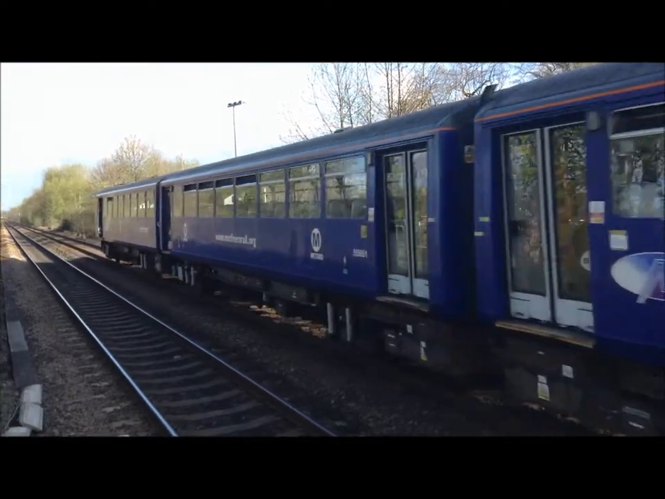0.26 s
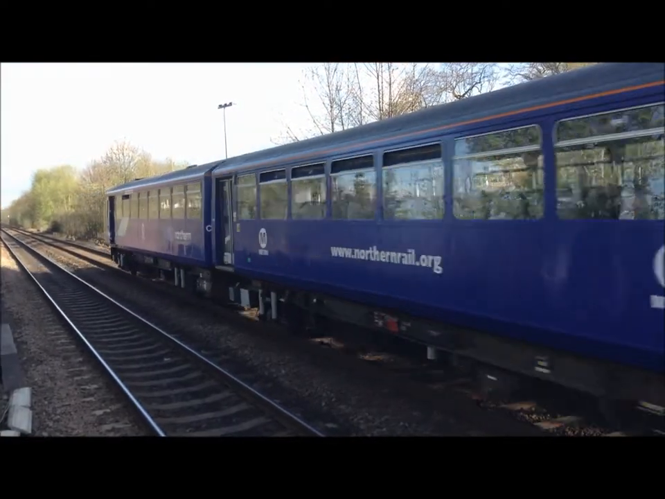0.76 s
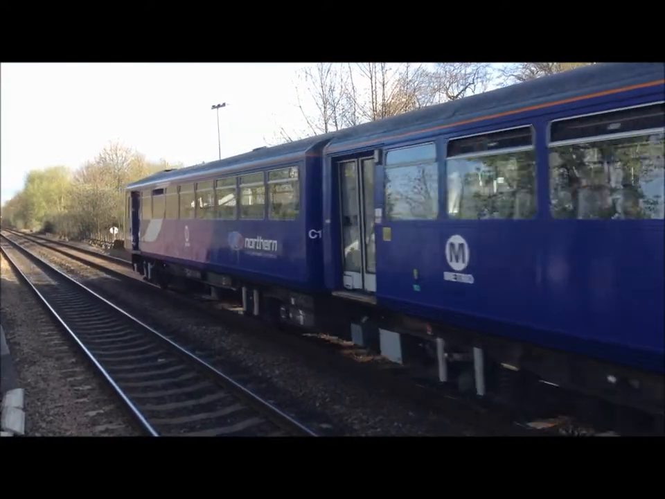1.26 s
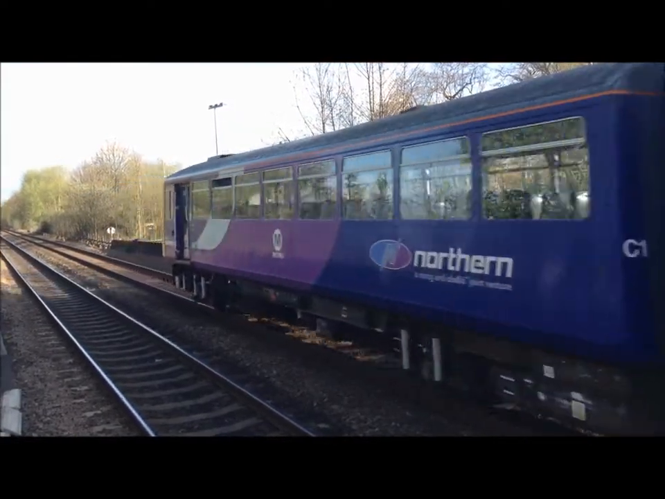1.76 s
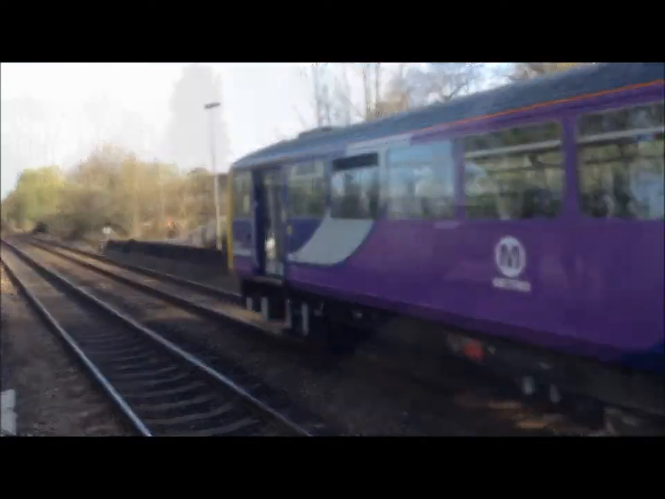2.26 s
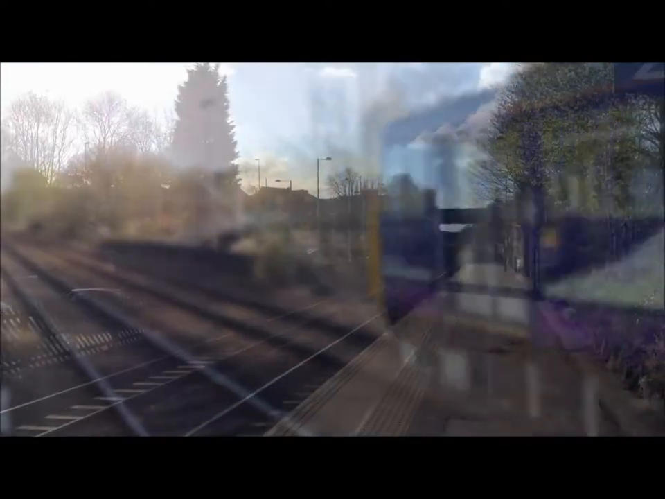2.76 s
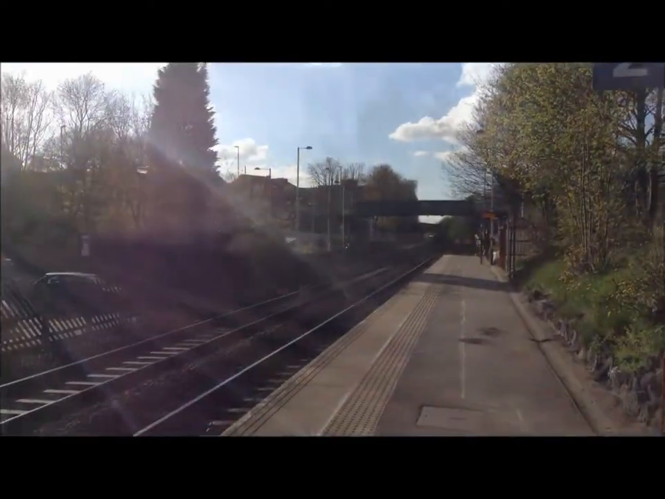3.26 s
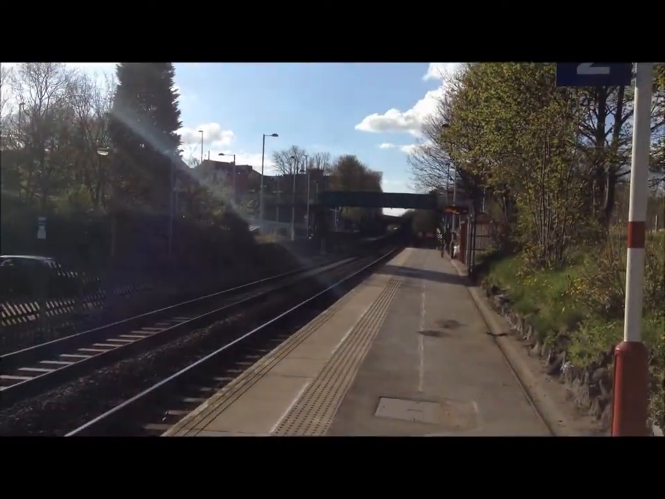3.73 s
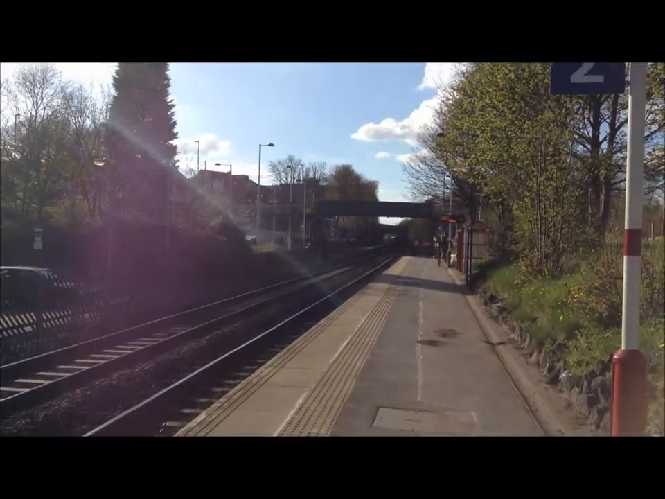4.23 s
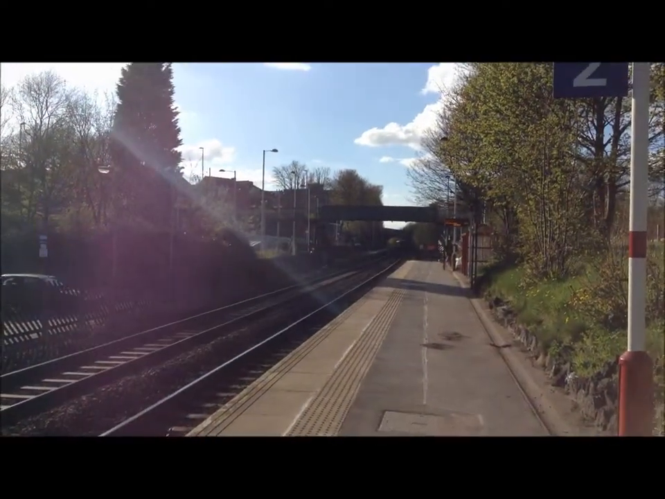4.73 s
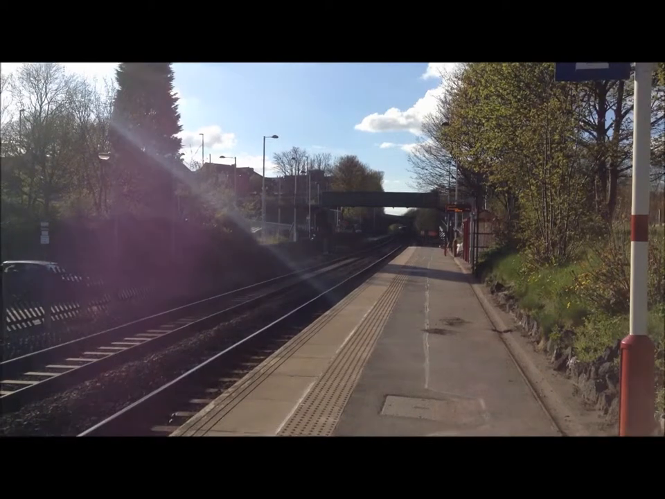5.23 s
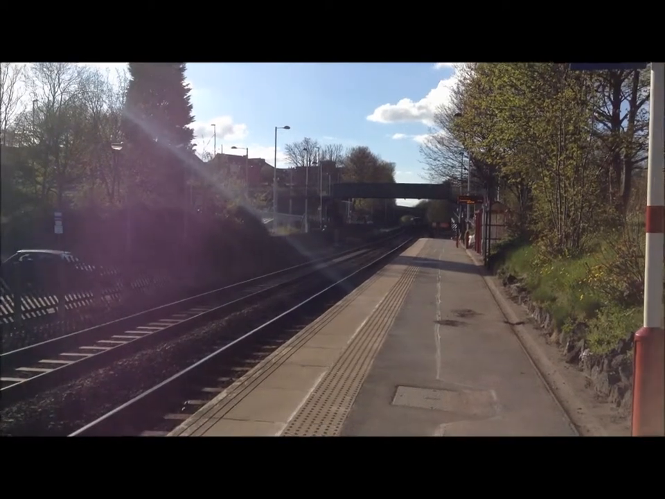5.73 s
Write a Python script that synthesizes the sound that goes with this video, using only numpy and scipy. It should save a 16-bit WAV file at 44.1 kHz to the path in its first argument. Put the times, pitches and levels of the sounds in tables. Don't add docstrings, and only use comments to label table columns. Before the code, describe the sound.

Outdoors beside the track, a loud, steady train rush fills the first three and a half seconds, with knocks, rapid hissing puffs, singing wheels, then piercing broken squeals as it dulls slightly. An instant cut leaves a soft far-road drone and hiss, a faint idling engine, tiny high chirps and a gently rising engine note. Near-mono, compact camera sound.

```python
import sys
import numpy as np
from scipy import signal
from scipy.fft import rfft, irfft, next_fast_len
from scipy.io import wavfile
from scipy.ndimage import uniform_filter1d, map_coordinates

SR = 44100
rng = np.random.default_rng(int(sys.argv[2]) if len(sys.argv) > 2 else 0)


def level_to_linear(level):
    exponent = np.asarray(level, float) / 20
    return 10 ** exponent


def wav_out(sig):
    wavfile.write(sys.argv[1], SR, np.round(np.clip(np.atleast_2d(sig).T, -1, 1) * 32767).astype(np.int16))


N = 264159
T = np.arange(N) / SR


def unit(x):
    return x / np.sqrt(np.mean(x ** 2) + 1e-20)


def curves(rows):
    s, *cols = np.transpose(rows)
    return [np.interp(T, s, c) for c in cols]


def wobble(rate):
    coarse = T[::64]
    knots = rng.standard_normal(int(N * rate / SR) + 4)
    return np.interp(T, coarse, map_coordinates(knots, [coarse * rate]))


def filtered(x, response):
    m = next_fast_len(len(x) + 8192)
    return irfft(rfft(x, m) * response(np.fft.rfftfreq(m, 1 / SR)), m)[:len(x)]


def rush(spectrum, patchy_db):
    z = signal.stft(rng.standard_normal(N), nperseg=512)[2]
    patches = uniform_filter1d(rng.standard_normal(z.shape), size=5, axis=0)
    patches = uniform_filter1d(patches, size=10, axis=1)
    white = signal.istft(z * level_to_linear(patchy_db * unit(patches)), nperseg=512)[1][:N]
    f, db = np.transpose(spectrum)
    return unit(filtered(white, lambda hz: level_to_linear(np.interp(np.log(hz + 1), np.log(f), db))))


def ring(white, hz, width):
    return unit(filtered(white, lambda f: (f * width / (hz * hz - f * f + 1j * f * width)) ** 2))


def rung(modes, swell_db, rate):
    white = rng.standard_normal(N)
    return sum(level_to_linear(db + swell_db * wobble(rate)) * ring(white, hz, width) for hz, width, db in modes)


def swells(events):
    white, out = rng.standard_normal(N), np.zeros(N)
    for s, d, hz, width, db in events:
        near = abs(T - s) < d / 2
        broken = level_to_linear(2.2 * wobble(16)[near])
        arch = np.cos(np.pi * (T[near] - s) / d)
        out[near] += level_to_linear(db) * broken * arch * ring(white[near], hz, width)
    return out


def tone(hz, db, flutter_db, rate):
    cycles = np.cumsum(hz + 0 * T) / SR + rng.random()
    return level_to_linear(db + 5.0 + flutter_db * wobble(rate)) * np.sin(2 * np.pi * cycles)


def traffic():
    # (time [s], low traffic level [dB], tyre hiss level [dB])
    road = [
        (3.63, -48, -43.5),
        (4.27, -47, -44.5),
        (4.66, -46, -42.5),
        (5.99, -47, -43.5),
    ]
    # (frequency [Hz], density [dB per Hz])
    drone_colour = [(15, -78), (25, -48), (64, -31), (86, -11.5), (151, -16), (185, -2), (220, -4.5),
                    (244, -4.5), (312, -5), (405, -14.5), (616, -4.5), (800, -14), (1040, -42.5),
                    (1760, -120)]
    # (frequency [Hz], density [dB per Hz])
    tyre_colour = [(350, -29.5), (600, -11), (658, -14.5), (834, -9), (953, -2.5), (1100, -6.5),
                   (1350, -8.5), (1580, -12), (2000, -11), (3170, -22), (3820, -25.5), (5090, -40),
                   (7000, -52), (9100, -75), (15400, -120)]
    bass_gone_s, bass_fade_s, bass_hz, bass_share = 4.6, .3, 125.2, .6
    drone_db, tyre_db = curves(road)
    drone = level_to_linear(drone_db + .6 * wobble(9)) * rush(drone_colour, patchy_db=1.1)
    gone = bass_share * np.clip((T - bass_gone_s) / bass_fade_s, 0, 1)
    drone = drone - gone * filtered(drone, lambda hz: 1 / (1 + (hz / bass_hz) ** 8))
    return drone + level_to_linear(tyre_db + .4 * wobble(9)) * rush(tyre_colour, patchy_db=.8)


def humming_tyres():
    # (middle [s], length [s], frequency [Hz], width [Hz], level [dB])
    hums = [(3.68, .4, 1100, 70, -49), (3.95, 0.45, 970, 90, -49), (3.9, .2, 1090, 70, -53),
            (4.47, .5, 990, 100, -50), (4.83, .35, 930, 60, -50), (5.08, .35, 960, 80, -51),
            (5.32, .2, 950, 80, -55), (5.76, .45, 980, 100, -55), (4.985, 0.083, 590, 25, -55),
            (5.18, .25, 477, 20, -58), (5.5, .14, 1300, 110, -51), (5.35, .2, 1400, 80, -54),
            (4.928, 1.6, 5000, 2900, -77), (5, .2, 199, 14, -53), (5.36, .2, 210, 14, -55),
            (5.56, 0.11, 150, 14, -53)]
    return swells(hums)


def idling_engine():
    # (frequency [Hz], level [dB])
    orders = [
        (96.9, -70),
        (193.8, -63),
    ]
    fade_db = 25 * np.clip(T - 4.6, 0, 1)
    return sum(tone(hz, db - fade_db, flutter_db=1.5, rate=8) for hz, db in orders)


def vehicle():
    # (time [s], firing rate [Hz], level [dB], upper orders [dB])
    run = [
        (4.6, 63.2, -62.5, -1),
        (5.23, 68.84, -64.5, -10),
        (5.45, 72.3, -56, -13),
        (5.56, 73.5, -56, -6),
        (5.68, 74.9, -56, -4),
        (5.73, 75.7, -54.5, 4.5),
        (5.87, 75.9, -54, -0.5),
        (5.99, 79.2, -53, 1),
    ]
    # (multiple of the firing rate [1], level [dB], share of the opening [1])
    pipe = [(1, -14, 0), (2, -3, 0), (3, -5, -.4), (4, -4, .3), (5, 0, .2), (6, 4, 1), (7, -4, 1),
            (8, -14, 1)]
    hz, db, upper_db = curves(run)
    hz = hz + .4 * wobble(12)
    db = db - 30 * np.clip(run[0][0] - T, 0, 1)
    return sum(tone(k * hz, db + level + opens * upper_db, flutter_db=1.4, rate=14) for k, level, opens in pipe)


def bird():
    # (start [s], length [s], pitch [Hz], level [dB])
    calls = [
        (4.91, .03, 7100, -80),
        (5.005, .08, 7050, -76),
        (5.215, .05, 7000, -77.5),
        (5.27, .05, 7050, -78.5),
    ]
    hoarse_hz = 60 * wobble(90)
    out = np.zeros(N)
    for s, d, hz, db in calls:
        arch = np.sin(np.pi * np.clip((T - s) / d, 0, 1))
        out += arch * tone(hz + hoarse_hz, db - 4, flutter_db=3, rate=80)
    return out


def exhaust():
    # (frequency [Hz], level [dB])
    orders = [
        (79, -63.5),
        (122, -55),
    ]
    return sum(tone(hz, db, flutter_db=2.5, rate=5) for hz, db in orders)


def engine_leak():
    # (time [s], peak level [dB])
    puffs = [(.4846, -21), (.772, -21), (.847, -16), (.885, -19), (.919, -13.5), (.958, -19),
             (.9975, -16.5), (1.034, -18.5), (1.074, -15.5), (1.112, -17), (1.149, -12.5), (1.189, -15.5),
             (1.226, -13), (1.3, -16.5), (1.34, -21), (1.4155, -20), (1.46, -16), (1.533, -18),
             (1.612, -17), (1.77, -17), (1.794, -20)]
    rise_s = 0.0049
    pressure = np.zeros(N)
    for s, db in puffs:
        u = np.clip(T - s, 0, 1) / rise_s
        pressure += level_to_linear(db) * u * np.exp(1 - u)
    return level_to_linear(-5) * pressure * rush([(3000, -120), (5000, -4), (9000, -5.5), (15300, -10.0)], patchy_db=1.5)


def air_hiss():
    # (frequency [Hz], density [dB per Hz])
    colour = [(2940, -33), (5000, -7), (7460, -3.5), (9390, -4), (10100, -6), (14300, -11.5), (15000, -15)]
    return rush(colour, patchy_db=0.5)


def track_rumble():
    # (frequency [Hz], density [dB per Hz])
    colour = [(15, -78), (25, -58), (48, -45), (188, -5), (289, -2.5), (382, -3.5), (515, 0.5), (569, -3.5),
              (729, -3), (1300, -14.5), (1690, -22.5), (2860, -120)]
    # (frequency [Hz], width [Hz], level under the rumble [dB])
    rail_modes = [(200, 32, -25.5), (291.2, 33, -9), (329.6, 19.5, -11.5), (440.8, 13, -15),
                  (517.7, 45, -9), (727.4, 78.7, -14)]
    return unit(rush(colour, patchy_db=1.2) + rung(rail_modes, swell_db=1.5, rate=12))


def wheel_roar():
    # (frequency [Hz], density [dB per Hz])
    colour = [(530, -25.5), (900, -2.5), (1040, -5.5), (1200, -0.5), (3180, -2.5), (3550, -5.5), (4620, -9),
              (5400, -9), (7000, -15.5), (9100, -45), (15400, -120)]
    # (frequency [Hz], width [Hz], level under the roar [dB])
    wheel_modes = [(2035, 240, -15), (3146, 176, -16), (4052, 220, -13.5), (5050, 320, -17.5),
                   (6095, 260, -20)]
    return unit(rush(colour, patchy_db=1.2) + rung(wheel_modes, swell_db=1.5, rate=6))


def flange_squeal():
    # (start [s], length [s], level [dB])
    grips = [(2.43, .03, -35), (2.48, .04, -39), (2.59, .025, -37), (2.635, .09, -37), (2.745, .03, -38),
             (2.855, .18, -34.5), (3.045, .07, -37), (3.12, .1, -35.5), (3.23, .08, -35.5),
             (3.325, .11, -33.5), (3.45, .05, -37), (3.52, .08, -37)]
    # (time [s], pitch [Hz], level [dB])
    glide = [
        (2.76, 9430, -55),
        (2.83, 9410, -42),
        (2.93, 9380, -41),
        (3.02, 9260, -52),
        (3.15, 9230, -43),
        (3.24, 9140, -36),
        (3.36, 9140, -43),
    ]
    squeal_hz, edge_s = 9083, .02
    grip = sum(level_to_linear(db) * np.clip(np.minimum(T - s, s + d - T) / edge_s + .5, 0, 1) for s, d, db in grips)
    first = grip * tone(squeal_hz + 5 * wobble(20), 0, flutter_db=1.8, rate=45)
    gliding = (T > glide[0][0]) * (T < glide[-1][0])
    return first + gliding * tone(*curves(glide), flutter_db=3, rate=35)


def singing_wheels():
    # (middle [s], length [s], pitch [Hz], level [dB])
    modes = [(0.35, 0.24, 750, -24.5), (.375, .16, 2000, -24), (0.365, .14, 2600, -27),
             (.12, 0.075, 2030, -23.5), (.17, .06, 2620, -26.5), (.2, .08, 3200, -28),
             (.27, .12, 1700, -28), (.42, 0.054, 2530, -24.5), (0.59, .08, 3200, -25),
             (.55, .07, 1800, -25), (0.56, .12, 4100, -30), (1.15, .35, 9200, -39), (0.515, .12, 5000, -26),
             (.43, .06, 5200, -31), (.69, .05, 4050, -28), (3.09, .05, 3000, -28), (.6, .2, 11000, -44),
             (0.81, 0.24, 490, -22.5), (.84, 0.82, 123.4, -40.5), (0.889, .25, 1930, -24),
             (.91, .5, 9250, -37), (.95, .6, 4300, -30), (.4, .3, 4050, -32.5), (2.2, .1, 2500, -27.5),
             (1.2, 0.098, 800, -26.5), (1.85, 0.53, 2394, -26.5), (1.952, 0.4, 1280, -31.5),
             (2.19, .1, 3150, -29), (2.399, 0.19, 2500, -29.5), (2.36, .14, 4200, -30),
             (3.11, .3, 5050, -34), (2.16, .06, 1300, -24), (2.27, .07, 2300, -25), (2.74, .06, 2100, -27),
             (1.96, .06, 3400, -28.5), (3.15, 0.61, 6700, -38), (3.547, .15, 1260, -32.5)]
    sharpness, sharper_per_khz = 15, 2.2
    return swells([(s, d, hz, hz / (sharpness + sharper_per_khz * hz / 1000), db) for s, d, hz, db in modes])


def train():
    # (time [s], nearness [dB], rolling brightness [dB])
    passing = [(0, -12.5, 0), (.38, -12, .5), (.55, -11.5, -1), (.66, -12.5, -1), (.76, -12, 0),
               (1, -12, 0), (1.3, -12.5, -1), (1.7, -13, 0), (2, -12, -1), (2.25, -12, -1),
               (2.4, -13, -0.5), (2.55, -13, -0.5), (2.75, -13, -0.5), (2.98, -12.5, -0.8), (3.2, -15, 0),
               (3.45, -16.5, -0.5), (3.52, -16, -1.5), (3.59, -17.5, 0.5)]
    # (time [s], thump on the rumble [dB], clank on the roar [dB])
    joints = [(0.339, -3.5, 2), (.62, 2, 1.5), (.70, -1.5, 2.5), (.86, 3, 0.5), (.9, -1.5, 3.5),
              (1.33, -0.5, 2.5), (1.57, -1.5, 2), (1.94, 2, 2), (2.15, 0.5, -0.5), (3.09, 1.5, 3.5),
              (3.54, 3.5, -2)]
    joint_s = 0.013
    gust_s, gust_span_s = 2.5, 0.24
    near_db, bright_db = curves(passing)
    thump_db, clank_db = sum(np.outer(dbs, np.exp(-((T - s) / joint_s) ** 2)) for s, *dbs in joints)
    gust_db = 1.5 * np.exp(-((T - gust_s) / gust_span_s) ** 2)
    jolt = wobble(14)
    rumble_db = near_db - 2.5 - .6 * bright_db + thump_db + .5 * jolt + 0.28 * wobble(24.5)
    roar_db = near_db - 3.5 + bright_db + clank_db + 0.53 * jolt
    air_db = near_db - 11 + 1.5 * bright_db + gust_db + 0.37 * jolt + 0.52 * wobble(30)
    wheels = level_to_linear(rumble_db) * track_rumble() + level_to_linear(roar_db) * wheel_roar()
    return wheels + level_to_linear(air_db) * air_hiss() + engine_leak() + exhaust() + flange_squeal()


def scene():
    # (time [s], share [0-1])
    leaving = [
        (2.85, 0),
        (3.1, 0.1),
        (3.6, 0.54),
    ]
    cut_s, dull_hz = 3.5965, 4500
    near, song = train(), singing_wheels() + humming_tyres()
    treble = filtered(near, lambda hz: hz ** 2 / (hz ** 2 + dull_hz ** 2))
    railcar = near - np.clip(curves(leaving)[0], 0, 1) * treble + song
    after = np.clip(T - cut_s, 0, 1)
    before = np.where(T < cut_s, 1, level_to_linear(-16 - 60 * after / 0.0203))
    platform = song * (T > cut_s + .05) + traffic() + idling_engine() + vehicle() + bird()
    mono = before * railcar + (T >= cut_s) * platform
    return np.array([mono, mono])


def thinned_treble(x):
    # (frequency [Hz], limit [dB])
    limits = [(6000, -24), (9000, -15.3), (12000, -13.8), (14000, -14.5), (15300, -15.5)]
    hz, _, z = signal.stft(x, SR, nperseg=1024)
    power = abs(z) ** 2

    def mean(v, bins, frames):
        return uniform_filter1d(uniform_filter1d(v, bins, axis=0), frames, axis=1)

    line = abs(mean(power, 3, 6))
    band = 1.78 * np.exp(mean(np.log(power + 1e-20), 31, 6))
    whole = uniform_filter1d(power.sum(0), size=5)
    limit = level_to_linear(np.interp(hz, *np.transpose(limits), left=-200))[:, None] ** 2 * band ** .7 * whole ** .3
    return signal.istft(z * (line > limit), SR, nperseg=1024)[1][:N]


def channel_splits():
    # (time [s], low edge [Hz])
    splits = [(.279, 9600), (.348, 5680), (.511, 6000), (1.254, 6280), (2.484, 4700), (2.484, 9000),
              (2.879, 5160), (3.227, 5680), (3.506, 8250)]
    side, white = np.zeros(N), rng.standard_normal(N)
    for s, lo_hz in splits:
        hi_hz, db = 1.21 * lo_hz, -24 - 1.2 * (lo_hz - 5000) / 1000
        near = abs(T - s) < .009
        band = unit(filtered(white[near], lambda hz: (hz > lo_hz) & (hz < hi_hz)))
        side[near] += level_to_linear(db) * band * np.hanning(near.sum()) ** .5
    return side


def band_limit(x):
    return signal.sosfilt(signal.butter(12, 15290, fs=SR, output="sos"), x)


def record(dry):
    mic_cut_hz, self_noise_db = 48, -72.5
    x = thinned_treble(filtered(dry[0], lambda hz: hz ** 2 / (hz ** 2 + mic_cut_hz ** 2)))
    x = x + level_to_linear(self_noise_db) * rng.standard_normal(N)
    side = channel_splits()
    mix = x / (1 + abs(x) ** 8) ** (1 / 8) + np.array([side, -side])
    return band_limit(mix)


dry = scene()
out = record(dry)
wav_out(out)
```